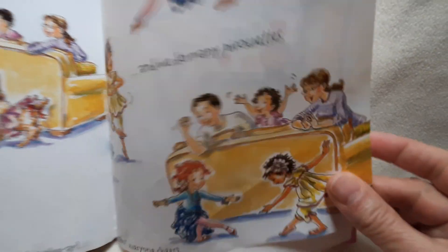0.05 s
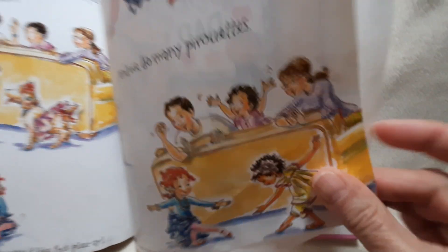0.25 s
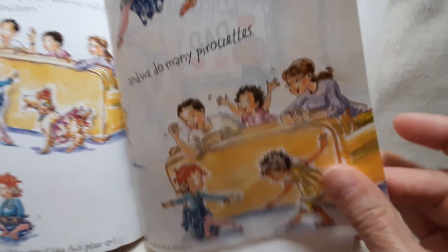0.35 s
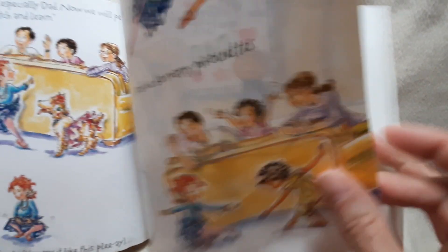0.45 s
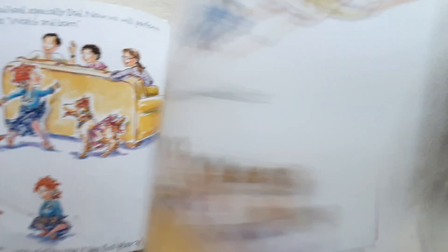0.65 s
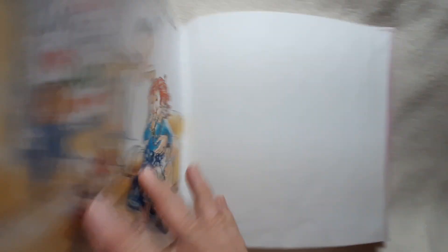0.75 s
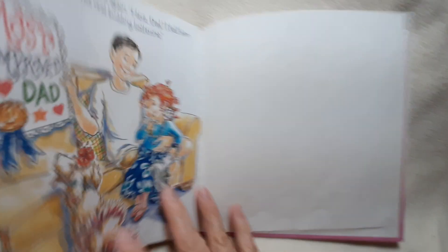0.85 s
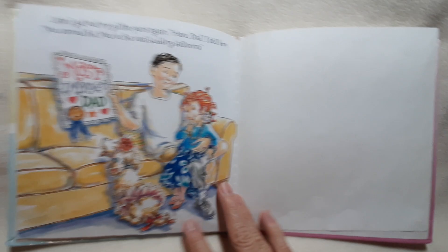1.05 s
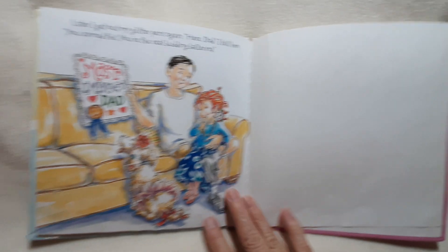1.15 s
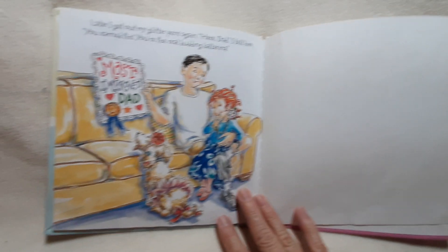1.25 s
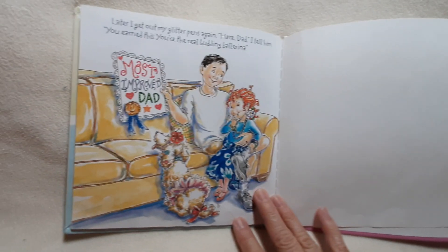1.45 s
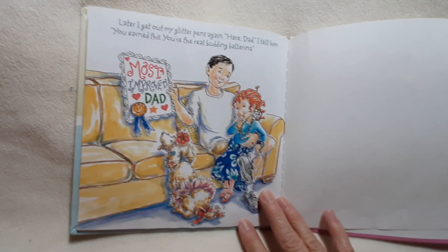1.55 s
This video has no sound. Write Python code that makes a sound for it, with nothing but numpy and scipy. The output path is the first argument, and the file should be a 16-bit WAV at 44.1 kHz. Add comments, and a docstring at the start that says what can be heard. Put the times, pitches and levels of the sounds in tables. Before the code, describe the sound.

A stiff book page is turned by hand, rustling and crackling, then smoothed down.

```python
"""A stiff picture-book page is lifted, swung over and smoothed down, close by in a quiet, damped room.
The sheet rubs on its neighbour as fibres catch and slip, ticks and buckles as it bends,
and lands on a puff of air. Fingers slide over it; at last a paper edge flicks free."""
import sys
import numpy as np
from scipy import signal
from scipy.fft import rfft, irfft
from scipy.io import wavfile

SR = 44100
rng = np.random.default_rng(int(sys.argv[2]) if len(sys.argv) > 2 else 0)


def wav_record(signal):
    """Record a signal, one row per channel, as 16-bit PCM in the file named by sys.argv[1]."""
    frames = np.transpose(np.atleast_2d(signal))
    bounded = np.clip(frames, -1, 1)
    # unit amplitude maps onto the largest positive 16-bit level
    quanta = np.round(bounded * 32767).astype(np.int16)
    wavfile.write(sys.argv[1], SR, quanta)


N = 70560
T = np.arange(N) / SR


def from_db(db):
    """Decibels to gain."""
    return 10 ** (np.asarray(db) / 20)


def panned(x, pan_db):
    """Left louder than right by pan_db, at constant power."""
    gains = from_db(np.array([[pan_db], [-pan_db]]) / 2)
    return x * gains / np.sqrt(np.mean(gains ** 2))


def through(x, response):
    """Convolve, cut to N samples."""
    return signal.fftconvolve(np.atleast_2d(x), np.atleast_2d(response), axes=-1)[:, :N]


def coloured(x, spectrum, size=8192):
    """Minimum-phase filter of unit energy, shaped by (frequency [Hz], level [dB]) points."""
    hz, db = np.transpose(spectrum)
    bins_hz = np.fft.rfftfreq(size, 1 / SR)
    gain = from_db(np.interp(np.log(bins_hz + 1), np.log(hz), db))
    gain /= np.sqrt(np.mean(gain ** 2))
    cepstrum = irfft(np.log(gain))
    cepstrum[1:size // 2] *= 2
    cepstrum[size // 2 + 1:] = 0
    return through(x, irfft(np.exp(rfft(cepstrum))))


def drift(rate_hz):
    """Straight lines between unit-variance random knots."""
    knots = rng.standard_normal(N)
    return np.interp(T * rate_hz, np.arange(N), knots)


def dying_noise(t60_s, start_s=0):
    """Decaying stereo noise, unit energy per side."""
    age_s = np.maximum(T - start_s, 0)
    x = rng.standard_normal((2, N)) * (T >= start_s) * from_db(-60 * age_s / t60_s)
    return x / np.sqrt(np.sum(x ** 2, axis=1, keepdims=True))


def pop(start_s, hz, swell_ms, glide=0):
    """A few cycles that swell and die; the pitch falls through hz by the fraction glide in all."""
    age_s = np.maximum(T - start_s, 0)
    swells = age_s * 1000 / swell_ms
    pitch_hz = hz * (1 + glide * (np.exp(-swells / 2) - 0.5))
    cycles = np.cumsum((age_s > 0) * pitch_hz) / SR
    return swells * np.exp(1 - swells) * np.sin(2 * np.pi * cycles)


def friction(spread_db, judder_db, shared, grains_per_s=14000):
    """Paper fibres catch and slip: dense uneven grains, partly common to both sides; rms 1."""
    grains = (rng.random((3, N)) < grains_per_s / SR) * rng.choice([-1, 1], (3, N))
    grains = grains * from_db(spread_db * np.minimum(rng.exponential(1, (3, N)), 4))
    stereo = np.sqrt(shared) * grains[2] + np.sqrt(1 - shared) * grains[:2]
    stereo *= from_db(judder_db * drift(rate_hz=220))
    return stereo / stereo.std()


def rubbing():
    """Paper slides on paper or under fingers: low flutter, hollow body, rasp and hiss."""
    # (start [s], rise [s], hold [s], t60 [s], bass [dB], middle [dB], treble [dB])
    strokes = [(0, 0.0033, 0.0034, 0.22, -69, -43, -56.5), (0.04, 0.0096, 0.024, 0.089, -55.5, -39.5, -54),
               (0.075, 0.011, 0.01, 0.31, -50, -45, -51.5), (0.174, 0.027, 0.02, 0.12, -49.5, -40, -54.5),
               (0.26, 0.017, 0.088, 0.11, -46.5, -38.5, -48),
               (0.339, 0.0059, .018, 0.13, -39, -26.5, -41.5), (0.37, 0.018, 0.048, .13, -48.5, -34, -42),
               (0.418, 0.0035, 0.021, .1, -49.5, -41, -52), (0.497, 0.022, 0.026, 0.26, -49, -63, -66),
               (0.554, 0.0044, 0.017, 0.11, -61, -57, -54.5), (0.585, 0.012, 0.02, 0.091, -42, -37, -45),
               (0.64, 0.011, 0.025, 0.037, -52, -44, -44.5), (.664, 0.0027, 0.052, 0.096, -34, -28, -68.5),
               (0.749, 0.014, .04, 0.2, -35.5, -34.5, -43.5),
               (0.812, 0.044, 0.016, .13, -49.5, -41.5, -42.5),
               (0.892, 0.016, 0.012, 0.18, -58, -44.5, -47), (0.925, 0.0076, 0.021, 0.19, -54.5, -50, -83),
               (0.959, 0.038, 0.038, 0.3, -73, -57, -56), (1.077, 0.059, 0.037, 0.25, -97, -53, -55.5),
               (1.27, 0.072, 0.016, 0.31, -90.5, -67, -70.5), (1.46, .04, .01, 0.42, -91.5, -72, -66),
               (1.549, .004, 0.016, 0.089, -88, -68, -73)]
    # friction spectra: (frequency [Hz], level [dB])
    flutter_spectrum = [(20, -31), (50, -4.5), (90, 1.5), (160, -3.5), (320, -6.5), (600, -18), (1200, -40),
                        (5000, -75)]
    rasp_spectrum = [(600, -42), (1050, -14), (1300, -2), (1490, 1.5), (1740, -4), (2060, 3.5),
                     (2400, -4.5), (3000, -5), (4000, -16), (6000, -29.5), (10000, -55.5)]
    hiss_spectrum = [(900, -49.5), (2500, -17), (4200, 3.5), (5600, 4.5), (7600, 1), (8700, -16.5),
                     (10300, -3), (12000, 0.5), (15500, -4.5), (17000, -24.5)]
    body_spectrum = [(60, -41), (200, -20.5), (400, -5), (720, -0.5), (950, -1), (1150, -1), (1700, -23.5),
                     (8000, -70.5)]
    power = 0
    for start_s, rise_s, hold_s, t60_s, *levels_db in strokes:
        swell = np.clip((T - start_s) / rise_s, 0, 1)
        fade = from_db(-60 * np.maximum(T - start_s - rise_s - hold_s, 0) / t60_s)
        power = power + np.outer(from_db(levels_db), swell * fade) ** 2
    bass, middle, treble = np.sqrt(power)
    low_middle = bass ** 0.53 * middle ** 0.47  # the body follows both flutter and rasp
    flutter = friction(spread_db=2.5, judder_db=3.0, shared=0.16) * bass * from_db(0.5)
    rasp = friction(spread_db=1.5, judder_db=2.1, shared=0.25) * middle * from_db(-1)
    hiss = friction(spread_db=2.5, judder_db=1.94, shared=0.05) * treble * from_db(-1)
    body = friction(spread_db=3.0, judder_db=2.5, shared=0.49) * low_middle * from_db(-3)
    return (panned(coloured(flutter, flutter_spectrum), pan_db=4.5)
            + panned(coloured(body, body_spectrum), pan_db=1)
            + panned(coloured(rasp, rasp_spectrum), pan_db=7.5)
            + panned(coloured(hiss, hiss_spectrum), pan_db=1.5))


def ticks(crack_above_hz=3700):
    """Sheet and binding click; the treble of each click is a brief crack of fibres."""
    # (time [s], level [dB], low-pass corner [Hz], pan [dB])
    events = [(0.0765, -11.5, 4000, 2.5), (0.141, -9, 3430, 4.5), (.180, -23.5, 5000, -3),
              (.213, -4, 4500, 7), (.247, -5.5, 7000, 6), (0.2673, 4.5, 1000, 4.5),
              (0.2821, -16.5, 5000, -1.5), (0.3093, -7, 3000, 5.5), (.317, -9, 3500, 13),
              (.342, 2, 5000, -4.5), (0.506, -27.5, 5000, 12), (0.524, -21, 10000, 4),
              (0.6074, -3.5, 900, 25.5), (0.6648, -3, 3000, 13.5), (.685, -9, 5000, 1.5),
              (0.7565, -9, 2000, 20), (.771, -11, 1500, 10), (0.7782, -14.5, 4000, 8),
              (0.8668, -17, 9000, 16), (0.9061, -19.5, 4000, 10.5)]
    # (frequency [Hz], level [dB])
    tick_spectrum = [(25, -24), (120, 0.5), (350, -1), (700, 2), (2000, -3), (3600, -6.5), (7500, -9),
                     (8800, -16), (12000, -10), (16000, -14)]
    clicks = np.zeros((2, N))
    for time_s, db, corner_hz, pan_db in events:
        pole = np.exp(-2 * np.pi * corner_hz / SR)
        impulse = (np.arange(N) == int(time_s * SR)) + 1e-18  # offset avoids denormals
        click = signal.lfilter([1 - pole], [1, -pole], impulse)
        clicks += panned(from_db(db) * click, pan_db)
    low = signal.sosfilt(signal.butter(2, crack_above_hz, fs=SR, output="sos"), clicks)
    high = signal.sosfilt(signal.butter(2, crack_above_hz, "high", fs=SR, output="sos"), clicks)
    crack = through(high, dying_noise(t60_s=0.015))
    return coloured(low + crack, tick_spectrum)


def sheet_ring(clicks):
    """Clicks plus the bending waves that briefly run about the page after each."""
    # (frequency [Hz], level [dB])
    sheet_spectrum = [(60, -4), (300, -3), (900, 1), (1800, 3), (3000, 0), (6000, -0.5), (15000, -2)]
    waves = through(clicks, dying_noise(t60_s=0.038))
    return clicks + from_db(-1.5) * coloured(waves, sheet_spectrum)


def air_puffs():
    """Soft low thumps of air pushed by the page as it flaps and lands."""
    # (time [s], level [dB], pitch [Hz], swell [ms])
    events = [(0.1412, -38.5, 75, 5), (0.666, -32, 90, 7.8), (0.699, -32.5, 76, 8.5),
              (.754, -30, 171.9, 2.5), (0.77, -23.5, 84, 6.6)]
    thumps = sum(from_db(db) * pop(time_s, hz, swell_ms) for time_s, db, hz, swell_ms in events)
    return panned(thumps, pan_db=13)


def buckles():
    """The sheet pops from one curve into another; a dry crackle spreads from each pop."""
    # (time [s], level [dB], pitch [Hz], swell [ms], pan [dB])
    events = [(.197, -28, 2600, 0.27, 14), (0.2127, -21.5, 1480, 0.19, 11.5), (.268, -14, 1450, 0.33, 19),
              (0.3438, -5.5, 1850, 0.49, 12.5), (.347, -9.5, 1580, 0.58, -15.5),
              (.3512, -19, 1400, 0.74, 12), (.355, -15.5, 863, 0.86, 1), (0.3601, -17.5, 1700, 0.67, 19.5),
              (.4329, -7, 2700, .45, 11), (.6112, -23.5, 1700, 0.5, 13), (0.6137, -19.5, 1500, 0.66, 14),
              (.6756, -4.5, 2250, 0.36, 24.5), (.6999, -6.5, 2200, 0.47, 12.5), (.7018, -11.5, 1470, 1, 11),
              (0.7038, -6.5, 2900, 0.49, 15), (.7078, -13, 2300, 0.58, 4.5), (.7122, -13, 1600, .5, 9.5),
              (.9058, -26.5, 2400, 0.28, 12), (1.277, -52.5, 1600, 0.44, -1),
              (1.3085, -56.5, 1500, 0.6, -2)]
    # (frequency [Hz], level [dB])
    crackle_spectrum = [(40, -36), (150, -21), (600, -13), (1000, -7), (1450, 3), (2600, 1), (3400, -5.5),
                        (4500, -16.5), (7500, -30), (10000, -52)]
    pops, crackle = np.zeros((2, 2, N))
    for time_s, db, hz, swell_ms, pan_db in events:
        snap = pop(time_s, hz, swell_ms, glide=0.21)  # high bending waves arrive first
        pops += panned(from_db(db) * snap, pan_db)
        crackle += panned(from_db(db) * dying_noise(t60_s=0.048, start_s=time_s), pan_db)
    return pops + from_db(11) * coloured(crackle, crackle_spectrum)


def edge_flick():
    """Short bright scratches as the edge slips off the page beneath."""
    # (time [s], level [dB], decay time constant [ms])
    catches = [(1.4142, -20, 2.5), (1.4177, -19.5, 2), (1.426, -9.5, 2.2), (1.4294, -6, 4.4),
               (1.4356, -9.5, 2.5), (1.4412, -17.5, 1.75), (1.446, -17.5, 14.6)]
    # (frequency [Hz], level [dB])
    edge_spectrum = [(60, -39.5), (250, -14), (700, -27.5), (1500, -6.5), (3600, -4), (5500, 6),
                     (7600, 3.5), (8800, -6.5), (11500, 3), (15500, -12.5)]
    scratches = np.zeros((2, N))
    for time_s, db, tau_ms in catches:
        t60_s = np.log(1000) * tau_ms / 1000
        scratches += from_db(db) * dying_noise(t60_s, time_s)
    return panned(coloured(scratches, edge_spectrum), pan_db=-1.5)


def scene():
    """The page, a short room reverberation and faint room noise."""
    # room noise: (frequency [Hz], level [dB])
    floor_spectrum = [(25, -1), (110, 6), (400, -10), (900, -13), (1600, -1), (4000, -12), (15000, -16.5)]
    page = sheet_ring(ticks()) + buckles() + rubbing() + edge_flick() + air_puffs()
    reverb = through(page.mean(axis=0), dying_noise(t60_s=0.16, start_s=0.0048))
    floor = coloured(rng.standard_normal((2, N)), floor_spectrum)
    return page + from_db(-17) * reverb + from_db(-74.5) * floor


def record(dry):
    """Steep elliptic low-pass."""
    cutoff_hz = 16000
    return signal.sosfilt(signal.ellip(10, 0.2, 80, cutoff_hz, fs=SR, output="sos"), dry)


dry = scene()
out = record(dry)
wav_record(out)
```